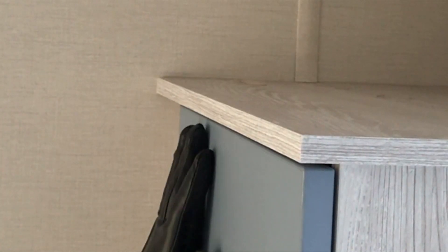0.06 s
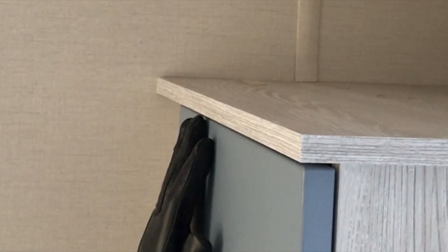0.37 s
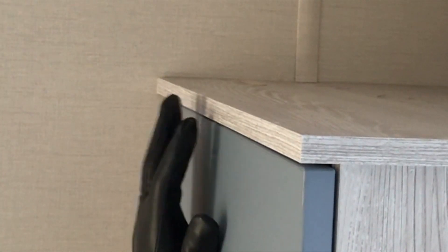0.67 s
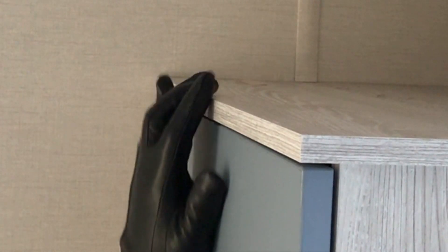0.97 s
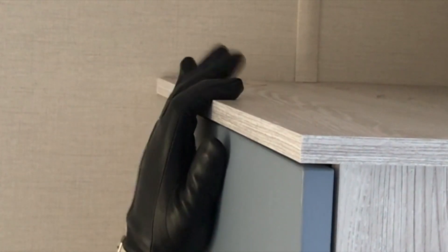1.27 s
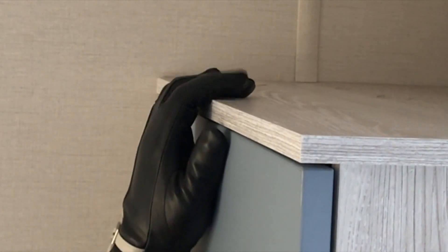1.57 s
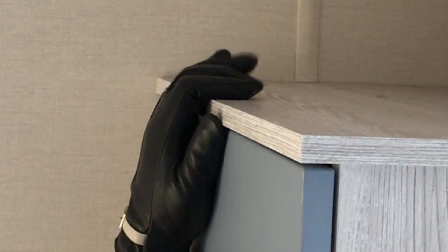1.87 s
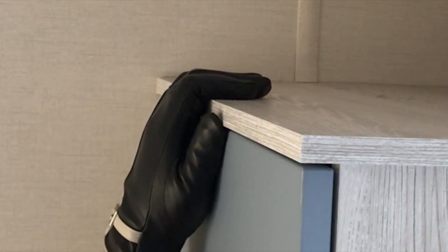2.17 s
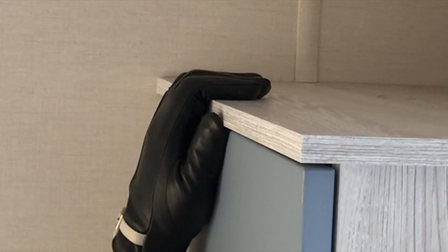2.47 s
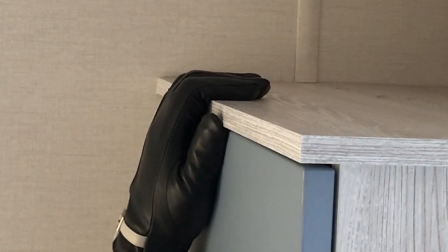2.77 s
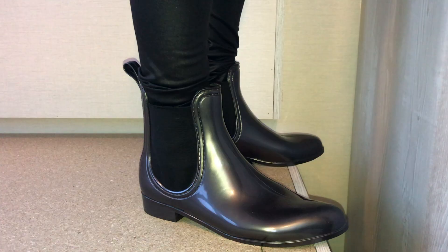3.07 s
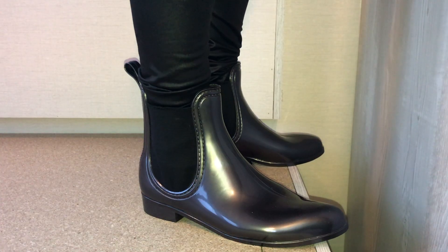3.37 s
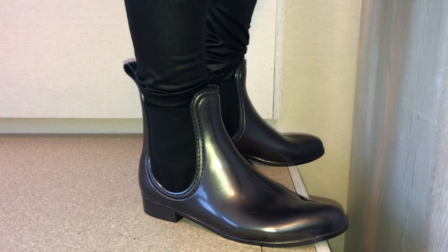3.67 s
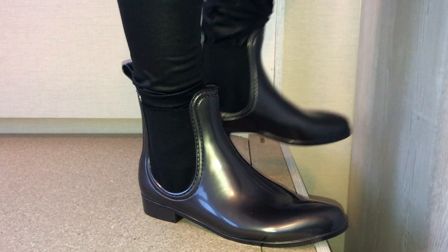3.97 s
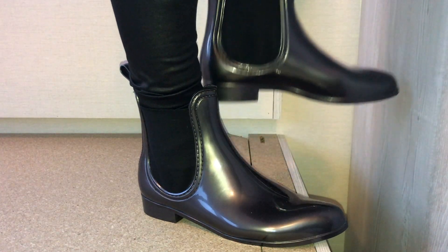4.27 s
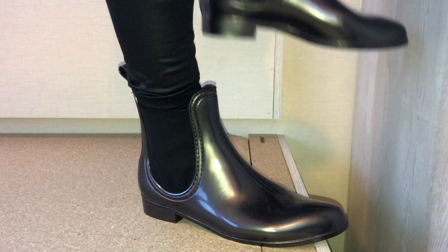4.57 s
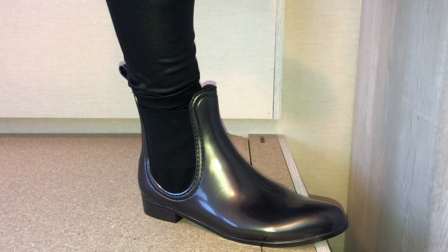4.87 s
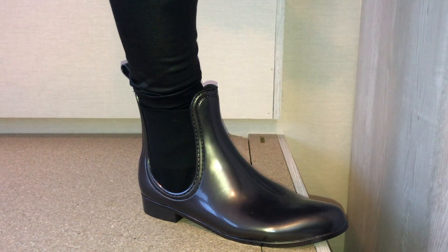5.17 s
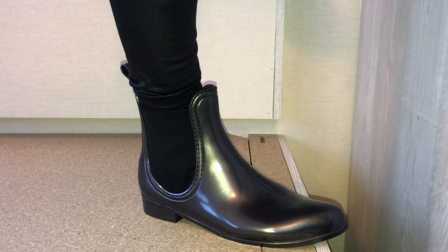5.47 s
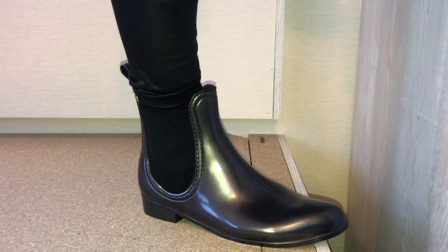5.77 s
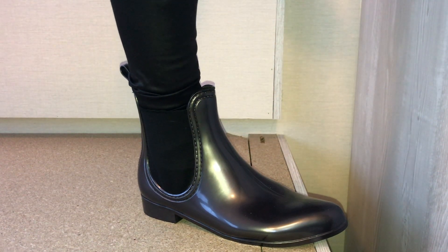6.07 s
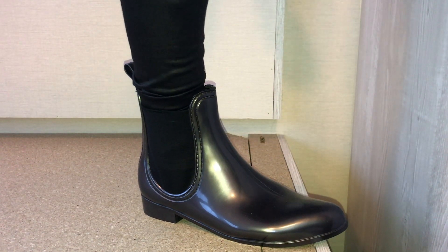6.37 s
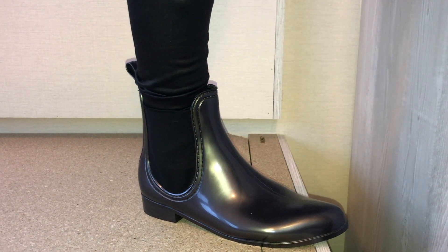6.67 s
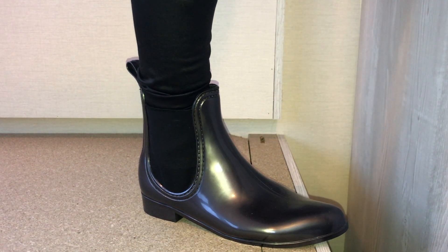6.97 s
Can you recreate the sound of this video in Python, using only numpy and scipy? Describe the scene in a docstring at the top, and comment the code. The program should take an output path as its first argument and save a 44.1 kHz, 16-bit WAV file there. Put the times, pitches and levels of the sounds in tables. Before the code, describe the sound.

Close, sparse pats and scuffs of a gloved hand on wood, followed by shifting rubber boots, swishing trousers and low ventilation noise.

```python
"""A small, dry room, one microphone close to a wooden cabinet, then down by the floor.
A leather-gloved hand feels its way up the cabinet and settles on top: pats thud in the panels, leather
scuffs, seams tick. Then, over a louder ventilation rumble, someone in rubber boots shifts onto one leg:
the rubber ticks as it lets go, the floor knocks back and trouser cloth swishes.
A faint, very high whine flickers behind it all."""
import sys
import numpy as np
from scipy import signal
from scipy.fft import rfft, irfft, next_fast_len
from scipy.io import wavfile
from scipy.ndimage import uniform_filter1d

SR = 44100
rng = np.random.default_rng(int(sys.argv[2]) if len(sys.argv) > 2 else 0)


def generate_wav(sig):
    """Save sig (samples, or channels by samples) to the path in sys.argv[1] as 16-bit PCM at SR."""
    pcm = np.round(np.clip(np.atleast_2d(sig).T, -1, 1) * 32767).astype(np.int16)
    wavfile.write(sys.argv[1], SR, pcm)


N = 317961


def amp(db):
    """Decibels to gain."""
    return 10 ** (np.asarray(db) / 20)


def unit_rms(x):
    """Scales to rms 1."""
    return x / np.sqrt(np.mean(x ** 2) + 1e-20)


def unit_peak(x):
    """Scales to peak 1."""
    return x / (abs(x).max() + 1e-20)


def unit_tick(x):
    """Scales to the energy of 10 ms at rms 1."""
    return x / np.linalg.norm(x) * np.sqrt(SR / 100)


def decay(t, t60_s):
    """Envelope that falls 60 dB in t60_s."""
    return np.exp(-np.log(1000) * t / t60_s)


def add(mix, start_s, sound):
    """Mixes a sound in at a time."""
    part = mix[max(round(start_s * SR), 0):][:len(sound)]
    part += sound[:len(part)]


def coloured(x, spectrum):
    """Shapes x by (freq_hz, level_db) points, at rms 1."""
    hz, db = np.transpose(spectrum)
    bins_hz = np.fft.rfftfreq(len(x), 1 / SR)
    gain = amp(np.interp(np.log(bins_hz + 1), np.log(hz), db))
    return unit_rms(irfft(rfft(x) * gain, len(x)))


def filtered(x, hz, kind, order=2):
    """Causal low-, high- or band-pass."""
    sos = signal.butter(order, np.clip(hz, 10, .48 * SR), kind, fs=SR, output="sos")
    return signal.sosfilt(sos, x)


def ringing(modes, flex_db=0):
    """A struck body: dying sines, neighbours swinging opposite ways; flex_db weights the lowest two."""
    t = np.arange(SR // 3) / SR
    return sum((-1) ** k * amp(db + flex_db * (k < 2)) * decay(t, t60_s) * np.sin(2 * np.pi * hz * t)
               for k, (hz, db, t60_s) in enumerate(modes))


def slips(size, spread_db=4):
    """Countless tiny stick-slip releases of uneven strength."""
    noise = rng.standard_normal(size)
    strength_db = spread_db * np.minimum(rng.exponential(1, size), 4)
    return unit_rms(noise * amp(strength_db))


def tick(low_hz, high_hz, t60_s, snap, skirt_db):
    """A snap and its brief scatter in one band, with a weaker skirt an octave to each side."""
    t = np.arange(SR // 10) / SR
    burst = rng.standard_normal(len(t)) * decay(t, t60_s)
    burst[0] = 2 * snap
    burst = filtered(burst, 1.05 * low_hz, "lowpass", order=1)  # soft materials favour the low end
    core = filtered(burst, [low_hz, high_hz], "bandpass", order=3)
    skirt = filtered(burst, [low_hz / 2, high_hz * 2], "bandpass")
    return unit_tick(core + amp(skirt_db) * skirt)


# Room tone by the cabinet; ventilation rumble and hiss down by the floor: freq_hz, level_db
CABINET_AIR = [(15, -74), (25, -5), (71, 1), (116, -4.5), (274, -14), (349, -11.5), (389, -14.5),
               (509, -21.5), (552, -20), (722, -24.5), (2120, -31), (7700, -35.5), (10600, -35.5),
               (15500, -35.5)]
VENT_RUMBLE = [(20, -22), (31, -8), (39, -27), (50, 0.5), (65, 3), (90, -4), (125, -9), (160, -9.5),
               (200, -17.5), (280, -17), (370, -19.5), (430, -26), (650, -32), (1000, -40), (2000, -55)]
VENT_HISS = [(500, -15), (1000, 2), (2000, 1.5), (4000, -2), (7500, -6), (10300, -9), (13000, -3.5),
             (16000, -7.5)]

def room_tone(floor_from_s=3.147, hum_hz=348, waver_hz=5):
    """Quiet air by the cabinet gives way abruptly to ventilation by the floor, with a wavering hum."""
    quiet, rumble, hiss, drift = rng.standard_normal((4, N))
    pitch_hz = hum_hz + waver_hz * unit_rms(filtered(drift, 12.2, "lowpass"))
    hum = amp(-57.5) * unit_rms(np.sin(2 * np.pi * np.cumsum(pitch_hz) / SR))
    vent = amp(-39) * coloured(rumble, VENT_RUMBLE) + amp(-64) * coloured(hiss, VENT_HISS) + hum
    still_air = amp(-56) * coloured(quiet, CABINET_AIR)
    at_floor = np.clip((np.arange(N) / SR - floor_from_s) / .0026, 0, 1)
    return (1 - at_floor) * still_air + at_floor * vent


def whine(blips_per_s=30, centre_hz=13050, settle_s=2.5):
    """A faint, very high whine flickers: scattered in pitch at first, then steadier and a little louder."""
    out = np.zeros(N)
    t = np.arange(round(.012 * SR)) / SR
    times = np.arange(0, N / SR, 1 / blips_per_s)
    for start_s, (detune, swell, lag) in zip(times, rng.standard_normal((len(times), 3))):
        scatter_hz, level_db = (450, -68) if start_s < settle_s else (100, -64)
        blip = np.hanning(len(t)) * np.sin(2 * np.pi * (centre_hz + scatter_hz * detune) * t)
        add(out, start_s + .0043 * lag, amp(level_db + 2 * swell) * blip)
    return out


def walls(x, t60_s=.2, band_hz=(300, 5000), echoes_per_s=2500):
    """Close walls return a short, dull tail of sparse reflections, from 3 ms after the direct sound."""
    t = np.arange(SR // 2) / SR
    signs = rng.choice([-1., 1.], len(t))
    arrivals = (rng.random(len(t)) < echoes_per_s / SR) & (t > .003)
    tail = filtered(signs * arrivals * decay(t, t60_s), band_hz, "bandpass", order=1)
    return signal.fftconvolve(x, tail / np.linalg.norm(tail))[:N]


def stroke(spectrum, peak_s, level_db, rise_s, fall_s, tilt_db_per_octave, catch_db=1.5, catch_hz=89.5):
    """Friction hiss follows the speed of one movement, catching unevenly; returns start_s, sound."""
    t = np.arange(-round(3 * rise_s * SR), round(3 * fall_s * SR)) / SR
    speed = np.exp(-(t / np.where(t < 0, rise_s, fall_s)) ** 2)
    tilted = [(hz, db + tilt_db_per_octave * np.log2(hz)) for hz, db in spectrum]
    hiss = coloured(slips(next_fast_len(len(t))), tilted)[:len(t)]
    flutter_db = catch_db * unit_rms(filtered(rng.standard_normal(len(t)), catch_hz, "lowpass"))
    sound = amp(level_db + flutter_db) * speed * hiss
    return peak_s + t[0], sound[peak_s + t >= 0]


# Hiss of rubbing trouser cloth: freq_hz, level_db
CLOTH_HISS = [(600, -32), (1200, -0.5), (1800, 0), (2400, -3), (3200, 2), (4800, -3), (5800, 1), (7500, -3),
              (10300, -4), (12500, 0), (16000, 0.5)]
# Resonances of the weave, relative to the hiss at its loudest: centre_hz, width_hz, level_db
WEAVE = [(1750, 420, -14), (5780, 300, -11.5)]
# Swishes of the leg, close by: peak_s, level_db, half_length_s, tilt_db_per_octave
SWISHES = [(3.134, -61, 0.019, -4), (3.529, -64.5, 0.12, -4.5), (3.894, -62, 0.14, -2.5),
           (4.299, -67.5, 0.47, 0), (4.954, -51.5, 0.061, 0.1), (5.268, -60, 0.19, 1.5),
           (5.67, -57.5, 0.1, 1), (5.814, -57, .055, -1), (5.974, -62, 0.058, 2), (6.207, -58, 0.066, 4),
           (6.338, -47.5, 0.048, 0), (6.436, -56.5, 0.089, 1), (6.591, -53, 0.071, 0.5),
           (7.079, -66, .11, -3.5)]

def trousers():
    """Cloth swishes as the leg lifts and sways; the weave sings with the square of the hiss level."""
    hiss = np.zeros(N)
    for peak_s, level_db, half_s, tilt in SWISHES:
        add(hiss, *stroke(CLOTH_HISS, peak_s, level_db, half_s, half_s, tilt))
    envelope = np.sqrt(abs(uniform_filter1d(hiss ** 2, size=SR // 100)))
    weave = np.zeros(N)
    for centre_hz, width_hz, level_db in WEAVE:
        band_hz = [centre_hz - width_hz / 2, centre_hz + width_hz / 2]
        weave += amp(level_db) * unit_rms(filtered(rng.standard_normal(N), band_hz, "bandpass"))
    return hiss + envelope * unit_peak(envelope) * weave


# Hiss of leather sliding on wood: freq_hz, level_db
GLOVE_HISS = [(500, -31), (1000, -6), (1800, -6), (3200, 0.5), (6000, -2.5), (8000, -4.5), (10300, -7.5),
              (12500, -3), (16000, -9.5)]
# Slides on the cabinet's door and top: peak_s, level_db, rise_s, fall_s, tilt_db_per_octave
GLOVE_SLIDES = [(.04, -52.5, 0.11, 0.11, 2.3), (0.289, -62, 0.029, 0.099, 0), (.54, -59, 0.022, 0.21, -1.6),
                (1.08, -63.5, 0.2, 0.19, 1), (1.38, -67, 0.071, 0.37, 2), (1.95, -59.5, 0.19, .14, -2)]

def glove_slides():
    """The glove slides softly between its pats."""
    out = np.zeros(N)
    for slide in GLOVE_SLIDES:
        add(out, *stroke(GLOVE_HISS, *slide))
    return out


# Modes of the floor under the boot: pitch_hz, level_db, t60_s
FLOOR_MODES = [(139, 3, 0.061), (237, 1, 0.061), (380, 3, 0.055), (463, -5, 0.057), (539, -4, 0.086),
               (693, -3.5, 0.038), (964, -1.5, 0.032)]
# Boot ticks, close by: start_s, level_db, low_hz, high_hz, t60_s, knock_db, knock_cutoff_hz
BOOT_TICKS = [(3.394, -50.5, 696, 3870, 0.035, -35.5, 790), (3.4218, -47, 2930, 4380, .034, -35, 600),
              (3.8272, -54.5, 1090, 5000, .02, -37, 500), (4.56, -58, 500, 2000, 0.03, -36, 800),
              (5.2825, -48.5, 910, 5100, 0.018, -22, 410), (5.4749, -51.5, 1070, 10200, 0.016, -37, 600),
              (5.496, -52.5, 700, 3620, 0.044, -34.5, 600), (5.6629, -54, 710, 2860, .03, -36.5, 794),
              (5.8847, -50, 920, 3200, .035, -41, 910), (5.9228, -55.5, 2080, 15000, .01, -40.5, 900),
              (5.9735, -54, 700, 2000, .045, -41, 900), (6.0166, -51, 1860, 16000, .014, -42.5, 1100),
              (6.74, -61, 3160, 4400, 0.022, -52, 900), (6.7606, -48, 520, 2620, 0.027, -27.5, 1000),
              (6.9668, -57, 595, 1100, .02, -41.5, 800)]

def boots(echo_s=.0024, shell_hz=2730):
    """Rubber lets go with a tick that can ring the boot's hard shell; the floor answers with a knock."""
    out = np.zeros(N)
    floor = ringing(FLOOR_MODES)
    shell = unit_tick(ringing([(shell_hz, 0, .018)]))
    for start_s, level_db, low_hz, high_hz, t60_s, knock_db, cutoff_hz in BOOT_TICKS:
        for delay_s, path_db in [(0, -2.5), (echo_s, -1)]:  # straight to the microphone, then off a corner
            release = tick(low_hz, high_hz, t60_s, snap=3.7, skirt_db=-15)
            add(out, start_s + delay_s, amp(level_db + path_db) * release)
        if low_hz < shell_hz < high_hz:
            add(out, start_s, amp(level_db - 8.5) * shell)
        knock = unit_peak(filtered(floor, [cutoff_hz / 4, cutoff_hz], "bandpass"))
        add(out, start_s + .0015, amp(knock_db) * knock)
    return out


# Modes of the cabinet and its top: pitch_hz, level_db, t60_s
CABINET_MODES = [(115.7, 7, 0.14), (150, 2, 0.19), (206.4, 6.5, 0.11), (250, -27, 0.038), (390, 2.5, 0.037),
                 (422, 4.5, 0.096), (528, 3, 0.04), (599, -0.5, 0.059), (667, -1.5, 0.065),
                 (877, -7, 0.076), (973, 2, 0.049), (990, 4.5, 0.033), (1055, -8, 0.079),
                 (1123, -9.5, 0.083), (1270, -17, 0.062), (1526, -7, 0.049), (1653, -24.5, 0.14),
                 (2520, -15, 0.094), (4350, -25, 0.078), (4500, -7, 0.069)]
# Rasp of leather pressed on wood: freq_hz, level_db
LEATHER_RASP = [(300, 8.5), (700, 6), (1300, -1), (2000, -1.5), (3300, -0.5), (4600, -4), (6000, -4.5),
                (8500, -9), (10300, -13.5), (12500, -10), (16000, -10.5)]

def scuff(peak_s, rasp_db, rise_s, t60_s, wood_db):
    """Slipping leather rasps directly and sets the cabinet ringing; returns start_s, sound."""
    t = np.arange(-SR // 10, SR // 4) / SR
    upper_modes = filtered(ringing(CABINET_MODES), 520, "highpass", order=5)
    upper_modes = filtered(upper_modes, 3500, "lowpass")
    pressure = np.where(t < 0, np.exp(-(t / rise_s) ** 2), decay(abs(t), t60_s))
    rasp = coloured(slips(len(t), spread_db=3.5), LEATHER_RASP) * pressure
    wood = signal.fftconvolve(slips(len(t)) * pressure, upper_modes)[:len(t)]
    wood = unit_rms(wood) * np.sqrt(np.mean(pressure ** 2))
    return peak_s + t[0], amp(rasp_db) * rasp + amp(wood_db) * wood


# Fingers dragged over the top: peak_s, rasp_db, rise_s, wood_db
DRAGS = [(1.404, -56.5, 0.027, -62), (1.83, -56.5, 0.012, -64), (1.882, -51, .012, -62),
         (1.97, -45, 0.015, -33), (1.999, -37, 0.026, -32.5), (2.326, -39.5, 0.01, -49.5)]
# Glove seams catching the wood: start_s, level_db, centre_hz, width_octaves
SEAM_TICKS = [(0.2765, -66, 1800, 2.5), (0.7428, -52, 3700, .6), (0.7485, -43, 3770, 0.62),
              (1.3433, -54, 4600, 2.1), (1.544, -65, 3300, .4), (1.715, -55.5, 1800, 3.5),
              (1.959, -48, 2600, 1.1), (2.083, -63, 4180, 1.4), (2.322, -43, 3900, .9),
              (2.7278, -69, 6100, 1.8)]

def fingers():
    """The fingers drag over the wood, and their seams tick on it."""
    out = np.zeros(N)
    for peak_s, rasp_db, rise_s, wood_db in DRAGS:
        add(out, *scuff(peak_s, rasp_db, rise_s, t60_s=.11, wood_db=wood_db))
    for start_s, level_db, centre_hz, width_octaves in SEAM_TICKS:
        edge_ratio = 2 ** (width_octaves / 2)
        seam = tick(centre_hz / edge_ratio, centre_hz * edge_ratio, t60_s=.028, snap=5.3, skirt_db=-5)
        add(out, start_s, amp(level_db) * seam)
    return out


# Pats on the cabinet, close by: touch_s, rasp_db, rise_s, thud_db, cutoff_hz, flex_db
PATS = [(.279, -55.5, 0.0042, -46.5, 302, -5), (0.42, -55, 0.0029, -41.5, 198, 14),
        (.445, -60, .004, -43, 148, -2), (0.537, -59.5, 0.01, -40.5, 140, 1),
        (0.749, -42.5, 0.0069, -25.5, 490, 2.5), (.885, -48.5, 0.0059, -27, 187, -11),
        (1.154, -58, 0.031, -39, 284, -4.5), (1.268, -47, 0.022, -39.5, 407, 2),
        (1.7, -54, 0.037, -42, 500, 1), (2.138, -52.5, 0.011, -40, 110, 7)]

def pats(landing_cycles=1.15, knuckle_hz=(764, 1500)):
    """Leather scuffs first; the padded hand pushes the low modes and its bones knock the middle ones."""
    out = np.zeros(N)
    knuckle = unit_peak(filtered(ringing(CABINET_MODES), knuckle_hz, "bandpass", order=3))
    for touch_s, rasp_db, rise_s, thud_db, cutoff_hz, flex_db in PATS:
        add(out, *scuff(touch_s, rasp_db, rise_s, t60_s=.12, wood_db=rasp_db - 7.5))
        thud = filtered(ringing(CABINET_MODES, flex_db), cutoff_hz, "lowpass")
        thud = unit_peak(filtered(thud, 86, "highpass"))
        add(out, touch_s + landing_cycles / cutoff_hz, amp(thud_db) * thud)  # a softer pat lands later
        add(out, touch_s, amp(thud_db - 17.5) * knuckle)
    return out


def scene():
    """Hand and boots up close, the walls faint behind them, over the room tone; mono."""
    hand = pats() + fingers()
    feet = boots()
    reflections = walls(amp(-13) * hand + amp(-13.5) * feet)
    return (hand + feet + reflections + glove_slides() + trousers() + room_tone() + whine())[None]


def record(dry):
    """The recorder cuts off steeply at 15.9 kHz."""
    lowpass = signal.firwin(511, 15900, window=("kaiser", 9), fs=SR)
    return signal.oaconvolve(dry, lowpass[None], "same")


dry = scene()
out = record(dry)
generate_wav(out)
```